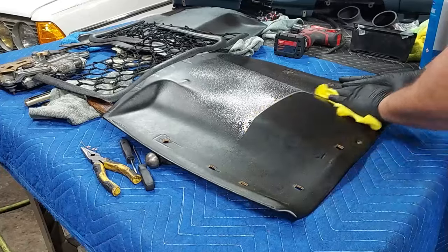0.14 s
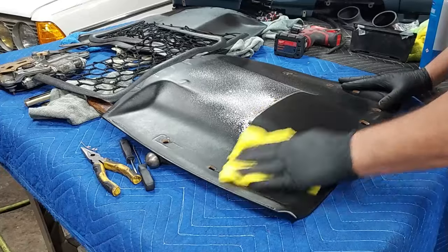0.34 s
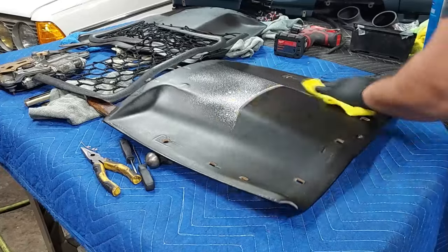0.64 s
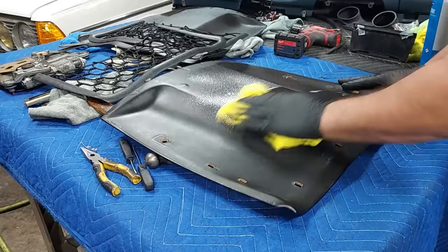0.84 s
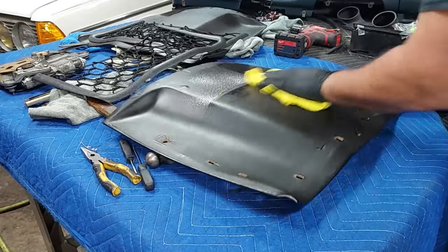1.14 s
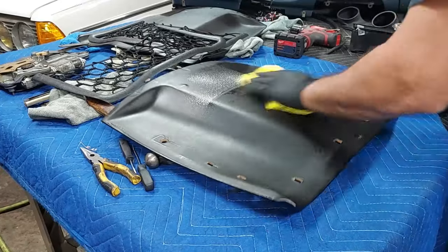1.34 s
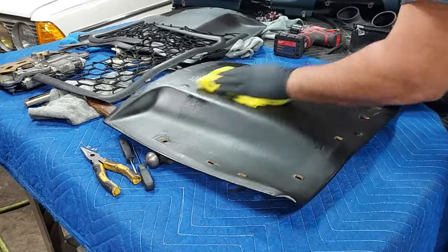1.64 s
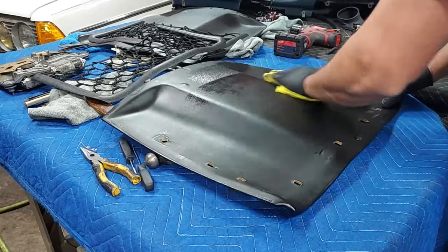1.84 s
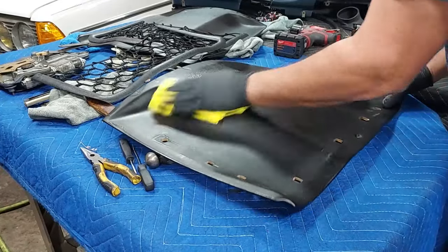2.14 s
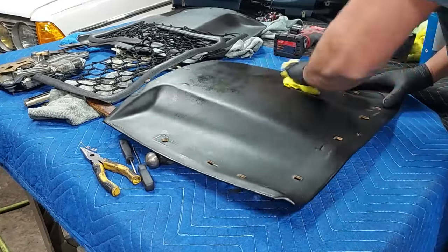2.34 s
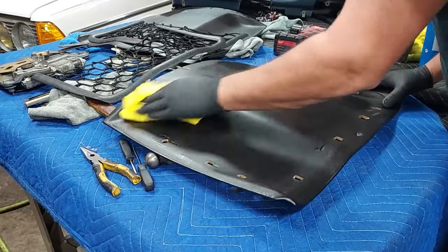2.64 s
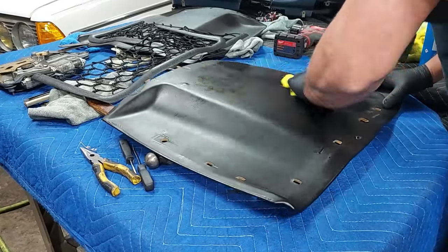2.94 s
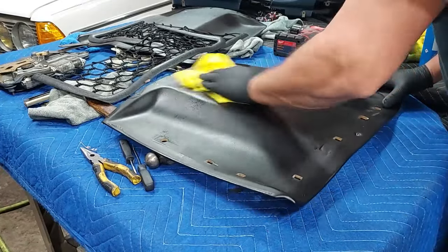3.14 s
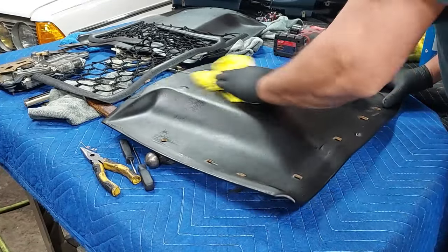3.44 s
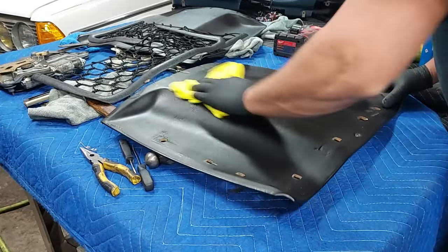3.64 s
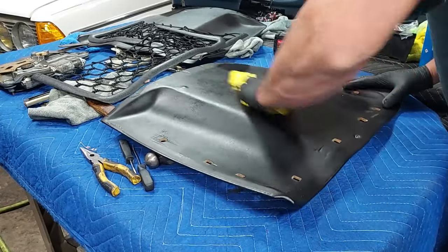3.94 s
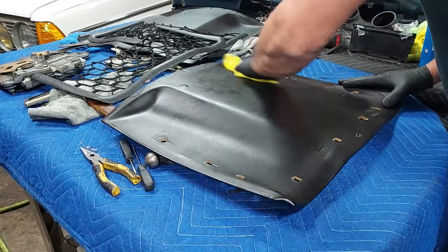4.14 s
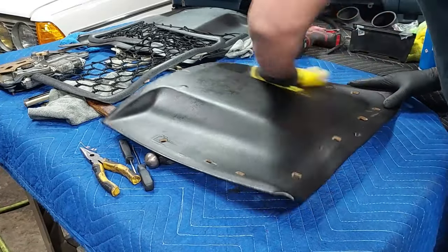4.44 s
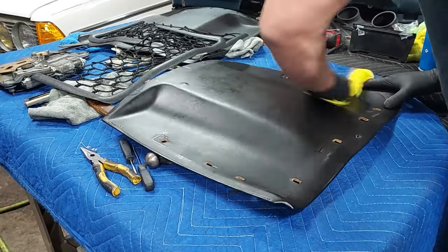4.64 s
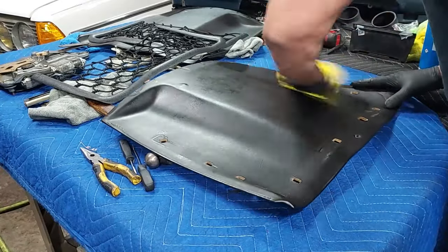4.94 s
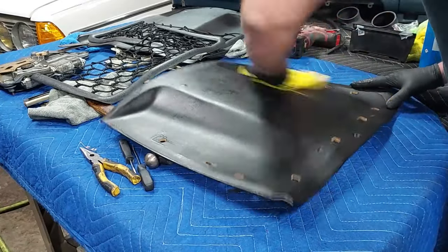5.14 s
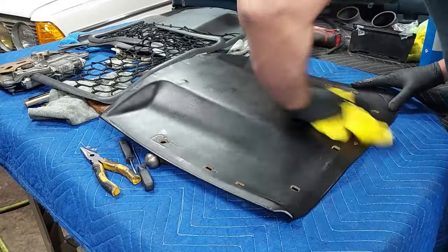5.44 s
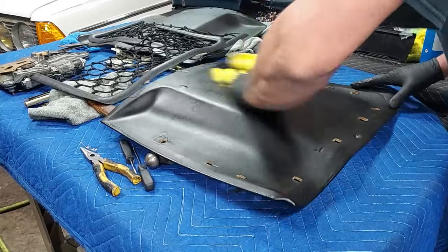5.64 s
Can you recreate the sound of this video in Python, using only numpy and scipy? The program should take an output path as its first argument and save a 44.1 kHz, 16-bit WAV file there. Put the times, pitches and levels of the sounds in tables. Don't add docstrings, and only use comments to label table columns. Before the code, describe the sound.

A cloth rasps in strokes across a hollow plastic panel on a padded bench, the panel knocking harder toward the end over low room hum.

```python
import sys
import numpy as np
from scipy import signal
from scipy.fft import rfft, irfft, next_fast_len
from scipy.io import wavfile
from scipy.ndimage import uniform_filter1d

SR = 44100
rng = np.random.default_rng(int(sys.argv[2]) if len(sys.argv) > 2 else 0)


def linear_from_db(decibels):
    return 10 ** (np.asarray(decibels, float) / 20)


def dump_mix(stems):
    frames = np.atleast_2d(stems).T
    limited = np.clip(frames, -1, 1)
    pcm = np.round(limited * 32767).astype(np.int16)
    wavfile.write(sys.argv[1], SR, pcm)


N = 255507
T = np.arange(N) / SR

# f/Hz, level/dB per Hz
HUM_SPECTRUM = [(26, -32), (42, 0), (80, -3.5), (127, -1.5), (180, -6.5), (476, -9.5), (840, -2),
                (1400, -25), (2300, -47), (4000, -68), (7700, -27), (12900, -36), (16000, -59)]
# f/Hz, likeness/0-1
STEREO_LIKENESS = [(60, 0.12), (180, 1), (550, 0.029), (1650, 0.34), (4970, 0.012), (15000, 0.018)]
# f/Hz, left minus right/dB
STEREO_LEANING = [(60, -11), (180, -1.5), (550, -0.5), (1650, -0.5), (4970, -1), (15000, 3)]
# f/Hz, t60/s
SHOP_DECAY = [(100, 0.28), (400, 0.3), (1000, 0.34), (3000, 0.13), (10000, 0.12)]
# t/s, level/dB, half length/s
ARM_LEANS = [(0.306, -56, 0.065), (0.813, -60, 0.11), (1.023, -54, 0.11), (1.8, -60, 0.12),
             (2.13, -47.5, 0.021), (2.553, -54, 0.068), (2.86, -47.5, 0.076), (3.243, -57, 0.07),
             (3.783, -47.5, .08), (4.16, -60, 0.029), (4.68, -45.5, 0.082), (5.094, -47.5, 0.081),
             (5.27, -37, 0.038), (5.452, -47.5, 0.033), (5.637, -50, 0.063), (5.79, -51, 0.029)]
# t/s, level/dB
HAND_PRESSURE = [(0, -68), (.85, -53), (1.1, -59), (1.5, -52), (1.75, -58.5), (2.55, -48.5), (2.7, -56),
                 (2.87, -52), (3.05, -66), (3.27, -63), (3.45, -62.5), (4.45, -54.5), (4.6, -45.5),
                 (5.05, -42.5), (5.2, -51), (5.32, -34.5), (5.55, -49), (5.79, -40)]
# f/Hz, level/dB, t60/s
PANEL_MODES = [(129.6, -20.5, 0.36), (222.4, -3, 0.1), (231.2, 0.5, 0.077), (275.8, -0.5, 0.12),
               (314, -1, 0.06), (364, 1, 0.06), (383.3, -1.5, 0.1), (430.6, -6.5, 0.076),
               (569.3, -10.5, 0.12), (475, -3.5, 0.058), (527, -6.5, 0.064), (663.6, -7, 0.087),
               (722.7, -9.5, 0.18), (800, -3.5, 0.027), (973, -13, 0.056), (1144, -5.5, 0.02),
               (1300, -67, 0.037), (1654, -13.5, 0.066), (2085, -16, 0.029), (2340, -15, 0.018),
               (2500, -25, 0.022), (3060, -31, 0.028)]
# t/s, peak level/dB, contact f/Hz, ring level/dB, tick level/dB
KNOCKS = [(0.4188, -27.5, 606, -18.5, -19), (0.9456, -35.5, 353, -7.5, -37), (1.5535, -33.5, 296, -10, -38),
          (1.8134, -42.5, 300, -2, -42), (2.1035, -33.5, 360, -13, -48), (2.2737, -21, 604, -15, -27.5),
          (2.2953, -30, 350, -35, -40), (2.4969, -35.5, 403, -4.5, -47), (2.5275, -35, 270, -19, -41),
          (2.77, -10.5, 600, -17.5, -34), (3.1725, -15, 620, -20, -28), (3.1875, -28.5, 397, -11.5, -37),
          (3.748, -13.5, 636, -17.5, -34), (4.5241, -15.5, 654, -18, -25.5), (4.9164, -38, 433, -14, -38),
          (5.2234, -2, 710, -16, -16.5), (5.2313, -7, 400, -55, -24), (5.5917, -6, 660, -13.5, -22),
          (5.61, -11, 520, -24, -35)]
# t/s, peak level/dB, pitch f/Hz, rebound share/0-1, ring level/dB
BOUNCES = [(0.427, -25.5, 268, 0.5, -10.5), (.78, -36, 270, 0.1, -8), (2.285, -39.5, 246, 0.1, 4),
           (2.795, -36, 720, 0.3, 9), (2.825, -28.5, 364, 0.9, -3), (2.862, -29, 398, 0.8, -24),
           (3.195, -35.5, 706, .2, 4.5), (3.24, -35, 346, 0, 0), (3.76, -24, 330, 1, -6),
           (3.775, -35, 700, 0.1, 0), (3.832, -27.5, 350, 1, -12), (3.876, -33, 500, 0, -10),
           (4.664, -30, 404, 0, -23), (4.706, -37.5, 1020, 0.2, 12.5), (4.842, -34.5, 860, 0, 4.5),
           (4.98, -32, 354, 0, -10), (5.014, -40.5, 935, .1, 13), (5.09, -41, 230, 0.2, 1),
           (5.243, -44, 596, 0, 0), (5.259, -21, 290, 0.8, -2), (5.272, -36, 800, 0.2, -11),
           (5.317, -22.5, 297, 0.5, 4.5), (5.645, -25, 334, 1, -20), (5.686, -22.5, 310, 0, 0)]
# turn t/s, rasp level at the turn/dB, rasp level in mid stroke/dB, hiss level/dB, rasp centre f/Hz
LONG_SWEEPS = [(-0.11, -66, -52, -51.5, 1900), (0.18, -74, -52, -50, 2160), (0.47, -59, -53, -54, 2440),
               (0.73, -68.5, -48, -50, 2560), (1.033, -71, -52, -55.5, 2650),
               (1.325, -63.5, -48.5, -53, 2250), (1.59, -61.5, -51.5, -55.5, 2460),
               (1.866, -74, -51, -55.5, 2310), (2.173, -66, -52, -54.5, 2150),
               (2.454, -66.5, -49.5, -53, 2370), (2.701, -79.5, -47.5, -49, 2200)]
SHORT_SCRUBS = [(3.012, -65, -48, -51.5, 2540), (3.185, -58, -48.5, -51, 2330),
                (3.315, -60, -43, -55, 1780), (3.454, -58.5, -49.5, -54, 2010),
                (3.612, -57, -44, -51.5, 2020), (3.752, -57, -45.5, -49, 2360),
                (3.939, -54.5, -48, -51, 1890), (4.165, -68, -45, -46, 2670),
                (4.392, -57, -47.5, -44.5, 2480), (4.587, -54, -47, -45, 2400),
                (4.759, -55, -45.5, -40.5, 2360), (4.922, -52.5, -46, -42.5, 2130),
                (5.098, -51, -51, -42.5, 2040), (5.278, -46.5, -47, -42, 2220),
                (5.453, -53, -49, -42.5, 2440), (5.638, -62, -48.5, -46.5, 2800),
                (5.83, -47, -49, -41, 2380)]
RASP_SPEED = 0.75, 0.033, 0.028
HISS_SPEED = 0.88, 0.023, 0.035
# t/s, peak level/dB, length/s
FLICKS = [
    (0.378, -28.5, 0.065),
    (0.858, -35.5, 0.023),
    (0.943, -37, 0.029),
    (1.535, -33.5, 0.038),
    (2.015, -36.5, 0.027),
    (2.102, -34, 0.024),
    (2.511, -33, 0.042),
    (5.679, -32, 0.05),
]
# t/s, peak level/dB, length/s
FOLD_RUSTLES = [(0.183, -41, .06), (0.519, -42.5, 0.033), (1.057, -49, 0.12), (1.336, -42.5, 0.09),
                (1.44, -47, .04), (1.59, -44.5, 0.098), (1.875, -43, 0.073), (1.935, -41.5, 0.039),
                (2.15, -45, 0.042), (2.38, -50, 0.025), (2.594, -49, 0.03), (2.945, -42.5, 0.1),
                (4.132, -48, 0.05), (4.585, -43.5, .04), (4.7, -39, 0.14), (5.06, -37, 0.02),
                (5.219, -34, 0.012), (5.775, -38, .02)]
# f/Hz, level/dB per Hz
HISS_SPECTRUM = [(2500, -7), (4500, -3), (6500, -4), (8000, -9), (10500, -1.5), (13500, -4), (16000, -0.5)]
# f/Hz, level/dB per Hz
RASP_SPECTRUM = [(700, -1), (1200, -7), (1700, -6), (2500, -6.5), (4000, -11), (6500, -36.5), (9000, -34)]


def at_hz(points, hz):
    curve_hz, value = np.transpose(points)
    return np.interp(np.log(hz), np.log(curve_hz), value)


def rms_one(x):
    return x / np.sqrt(np.mean(x ** 2) + 1e-20)


def running_level(x):
    return np.sqrt(uniform_filter1d(np.mean(x ** 2, axis=0), size=SR // 5) + 1e-20)


def drift(rate_hz):
    return np.interp(T * rate_hz, np.arange(400), rng.standard_normal(400))


def grains(per_s, spread_db, shape=(2, 2, N)):
    born = rng.uniform(-1, 1, shape)
    sizes = linear_from_db(spread_db * np.minimum(rng.exponential(1, shape), 5))
    return rms_one(sizes * np.sign(born) * (np.abs(born) < per_s / SR))


def bands(source, spectrum, patchy_db, low_hz, high_hz, lift_db=None):
    edges = 22 * 2 ** np.arange(0, 9.9, 0.4)
    edges = edges[(edges >= low_hz) & (edges <= high_hz)]
    out = 0
    for k, (low, high) in enumerate(zip(edges, edges[1:])):
        band = signal.butter(2, [low, high], "band", fs=SR, output="sos")
        mid, side = signal.sosfilt(band, source[k % 2])
        hz = np.sqrt(low * high)
        alike = at_hz(STEREO_LIKENESS, hz)
        lean_db = at_hz(STEREO_LEANING, hz) / 2
        level_db = at_hz(spectrum, hz) + patchy_db * drift(9.1)
        if lift_db:
            level_db = level_db + lift_db(hz)
        pair = np.sqrt(1 + alike) * mid + np.sqrt(1 - alike) * side * [[1], [-1]]
        out = out + linear_from_db(level_db) * pair * linear_from_db([[lean_db], [-lean_db]])
    return out / running_level(out)


def room_hum():
    noise = rng.standard_normal((2, 2, N))
    return linear_from_db(-53) * bands(noise, HUM_SPECTRUM, 0.86, low_hz=20, high_hz=19000)


def shop(x):
    size = next_fast_len(N + SR)
    hz = np.maximum(np.arange(size // 2 + 1) * SR / size, 1)
    t60 = at_hz(SHOP_DECAY, hz)
    spectrum, out = rfft(x, size), []
    for lags_s in rng.uniform(0.0099, 0.045, (2, 10)):
        tail = 0
        for k, lag in enumerate(lags_s):
            loop = linear_from_db(-60 * lag / t60) * np.exp(-2j * np.pi * hz * lag)
            tail = tail + (-1) ** k * loop / (1 - loop)
        out.append(irfft(spectrum * linear_from_db(-18) * tail, size)[:N])
    return np.array(out)


def bench():
    low_band = signal.butter(3, [48, 125], "band", fs=SR, output="sos")
    low = signal.sosfilt(low_band, rng.standard_normal(N))
    swell = linear_from_db(-58)
    for s, db, half_s in ARM_LEANS:
        swell = swell + linear_from_db(db) * np.exp(-((T - s) / half_s) ** 2)
    return swell * rms_one(low) * linear_from_db([[-5], [2]])


def contacts():
    hard = [(s, db, hz, 0.41 * (hz / 650) ** 1.8, ring_db, tick_db)
            for s, db, hz, ring_db, tick_db in KNOCKS]
    soft = [(*row, -38) for row in BOUNCES]
    return hard + soft


def rumble(rasp_db):
    pressure_db = np.interp(T, *np.transpose(HAND_PRESSURE))
    level_db = pressure_db + 0.097 * (rasp_db - rasp_db.mean())
    return linear_from_db(level_db - 29.5 + drift(8.2)) * grains(250, 3.24, shape=N)


def loose_edge_chatter(at, hits):
    settling, t60 = np.zeros(N), 0.44
    settling[at] = hits * linear_from_db(-33.5)
    settling = signal.lfilter([1], [1, -linear_from_db(-60 / (t60 * SR))], settling + 1e-18)
    return settling * grains(2000, 1.5, shape=N)


def ring(force, hz, t60):
    r, w = linear_from_db(-60 / (t60 * SR)), 2 * np.pi * hz / SR
    return signal.lfilter([0, np.sin(w)], [1, -2 * r * np.cos(w), r * r], force + 1e-18)


def panel(drag):
    s, db, contact_hz, _, ring_db, tick_db = np.transpose(contacts())
    at, soft = (s * SR).astype(int), np.arange(len(s)) >= len(KNOCKS)
    luck_db = rng.normal(0, 2, (len(s), len(PANEL_MODES)))
    lean_db = rng.normal(0, 1.8, len(PANEL_MODES))
    chatter = loose_edge_chatter(at, linear_from_db(db + ring_db) * ~soft)
    out = 0
    for k, (hz, mode_db, t60) in enumerate(PANEL_MODES):
        force = drag / (1 + (hz / 900) ** 4) + chatter
        near = np.exp(-(np.log2(hz / contact_hz) / 0.3) ** 2)
        below = np.exp(-(hz / contact_hz / 1.6) ** 2) + linear_from_db(tick_db + 8)
        force[at] += linear_from_db(db + ring_db - 1 + luck_db[:, k]) * np.where(soft, near, below)
        lean = linear_from_db([[lean_db[k]], [-lean_db[k]]])
        out = out + linear_from_db(mode_db) * (-1) ** k * ring(force, hz, t60) * lean
    return out


def knocks():
    sound, t = np.zeros(N + SR), np.arange(-150, 150) / SR
    v = np.pi * 1350 * t
    tick = -(1 - 3 * v ** 2) / (1 + v ** 2) ** 3
    rebound_s = 0.003057
    for s, db, hz, rebound, _, tick_db in contacts():
        u = np.pi * hz * t
        push = -(1 - 2 * u ** 2) * np.exp(-u ** 2)
        blow = linear_from_db(db - 4.5) * (push + linear_from_db(tick_db + 24) * tick)
        for k in range(5):
            i = round((s + k * rebound_s) * SR) - 150
            sound[i:i + 300] += np.clip(rebound, 0, 0.9) ** k * blow
    sound = sound[:N]
    later = np.interp(np.arange(N) - 0.0001 * SR, np.arange(N), sound)
    return np.array([sound * linear_from_db(-2.0), later * linear_from_db(1.3)])


def strokes():
    turn_s, turn_db, rasp_db, hiss_db, centre_hz = np.transpose(LONG_SWEEPS + SHORT_SCRUBS)
    k = np.searchsorted(turn_s, T) - 1
    since, until = T - turn_s[k], turn_s[k + 1] - T
    along = since / (since + until)
    arc = np.abs(np.sin(np.pi * along))

    def speed(arch, up_s, down_s):
        return arc ** arch * np.tanh((since / up_s) ** 2) * np.tanh((until / down_s) ** 2)

    slow_db = np.interp(T, turn_s, turn_db)
    hiss_slow_db = -56 + 0.28 * (slow_db - np.mean(turn_db))
    swell_db = np.where(k % 2, 1.5, -2) * arc * (2 * along - 1) * 2
    rasp_now = slow_db + (rasp_db[k] - slow_db) * speed(*RASP_SPEED) + swell_db + drift(14)
    hiss_now = hiss_slow_db + (hiss_db[k] - hiss_slow_db) * speed(*HISS_SPEED) + 2.4 * drift(30)
    octaves = 0.5 * (0.5 - along) - 0.2 * (1 - arc)
    return rasp_now, hiss_now, uniform_filter1d(centre_hz[k] * 2 ** octaves, size=SR // 50)


def flicks():
    swell = np.zeros(N)
    for s, db, length_s in FLICKS + FOLD_RUSTLES:
        i = round(s * SR)
        u = np.arange(min(int(2 * length_s * SR), N - i)) / SR / length_s
        rise = np.clip(u / 0.16, 0, 1)
        swell[i:i + len(u)] += linear_from_db(db - 7) * rise * np.exp(-u ** 3)
    return swell


def hiss(slips, level_db):
    flick = flicks()
    gain = np.hypot(linear_from_db(level_db), flick)
    share = (flick / gain) ** 2
    tilt_db = 3.5 * share - 0.19 * (1 - share) * (level_db - level_db.mean())

    def lift(hz):
        return tilt_db * np.log2(hz / 10000)

    return gain * bands(slips, HISS_SPECTRUM, 2, low_hz=2000, high_hz=19000, lift_db=lift)


def rasp(slips, level_db, centre_hz):
    octave = np.log2(centre_hz)

    def hump(hz):
        return 9 / (1 + ((np.log2(hz) - octave) / 0.5) ** 2)

    gain = linear_from_db(np.minimum(level_db, -43))
    return gain * bands(slips, RASP_SPECTRUM, 1.5, low_hz=600, high_hz=10000, lift_db=hump)


def scene():
    rasp_db, hiss_db, centre_hz = strokes()
    struck = knocks() + panel(rumble(rasp_db))
    slips = grains(12000, 3.2)
    other_slips = slips[::-1, ::-1, ::-1]
    cloth = rasp(slips, rasp_db, centre_hz) + hiss(other_slips, hiss_db)
    return room_hum() + bench() + shop(struck.mean(axis=0)) + struck + cloth


def low_pass(x):
    return signal.sosfilt(signal.butter(12, 16880, fs=SR, output="sos"), x)


def record(dry):
    rounded = np.tanh(dry / 1.1) * 1.1
    top_cut = signal.ellip(10, 0.5, 70, 15850, fs=SR, output="sos")
    finished = np.clip(signal.sosfilt(top_cut, rounded), -0.9, 0.9)
    return low_pass(finished)


dry = scene()
out = record(dry)
dump_mix(out)
```